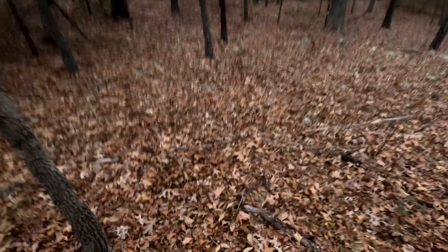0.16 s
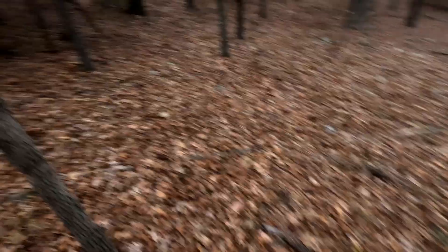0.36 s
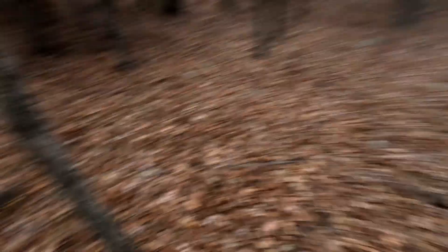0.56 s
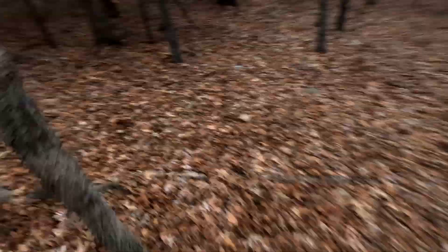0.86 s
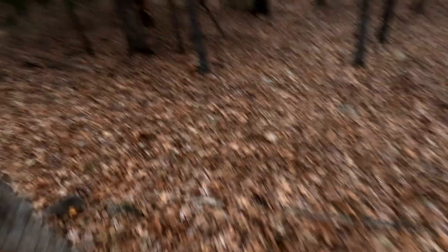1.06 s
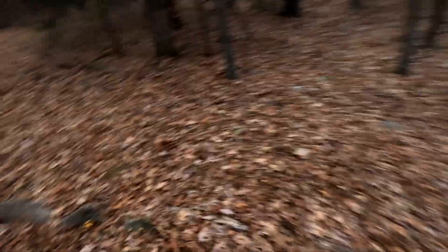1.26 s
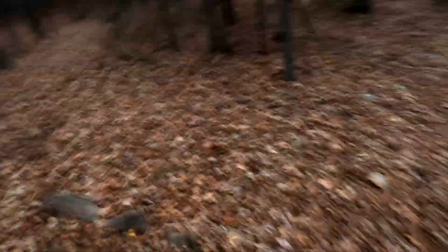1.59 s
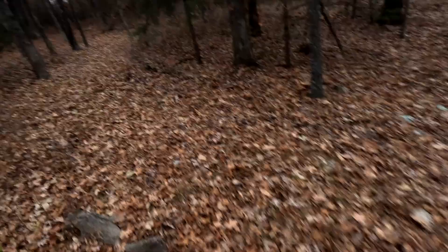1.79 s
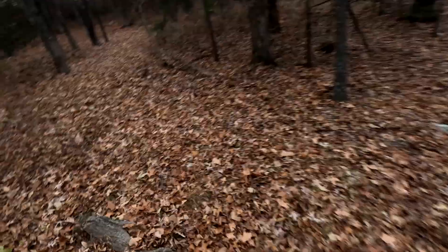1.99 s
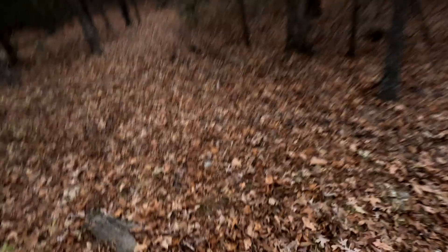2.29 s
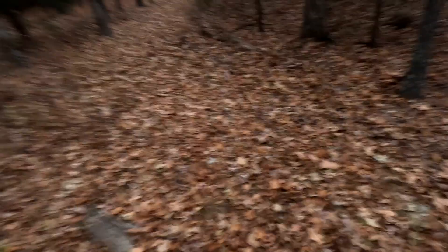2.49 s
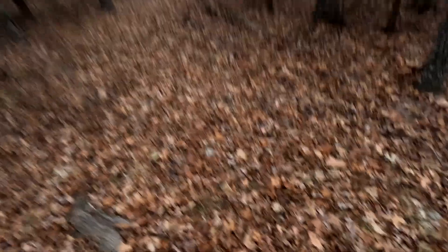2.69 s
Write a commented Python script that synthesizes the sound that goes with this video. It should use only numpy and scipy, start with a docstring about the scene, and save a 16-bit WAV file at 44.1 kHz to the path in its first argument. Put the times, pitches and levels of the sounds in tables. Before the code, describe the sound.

Brisk footsteps swish and crunch through dry fallen leaves in a still wood, with soft thuds on the soil. Twigs snap about halfway, then the steps continue. A close hand-held microphone rumbles low with the stride.

```python
"""Brisk steps through dry leaves

A still wood, heard from a hand-held microphone above the feet. Each foot sweeps the loose leaves
(a bright swish), then crushes the litter below (a darker crunch) and thuds on the soil. Twigs snap,
buried wood knocks and single leaves tick, while the swaying microphone rumbles with the stride."""
import sys
import numpy as np
from scipy import signal
from scipy.fft import rfft, irfft
from scipy.io import wavfile
from scipy.ndimage import uniform_filter1d

SR = 44100
rng = np.random.default_rng(int(sys.argv[2]) if len(sys.argv) > 2 else 0)


def unload_audio(sound):
    """Save the sound as a 16-bit wav file, at the path given as the first command line argument."""
    columns = np.transpose(np.atleast_2d(sound))
    # keep every value between -1 and 1, then stretch to whole-number steps
    steps = np.round(np.clip(columns, -1, 1) * 32767)
    wavfile.write(sys.argv[1], SR, steps.astype(np.int16))


N = 125685
TIME = np.arange(N) / SR
PADDED = 2 ** 17 + 2 ** 14   # FFT length, with room for filter tails
FREQS = np.maximum(np.arange(PADDED // 2 + 1) * SR / PADDED, 1)

# a foot sweeps loose leaves:
# (time [s], level [dB], rise [s], hold [s], fall [s], tilt [dB/octave], ring [Hz], ring gain [dB])
LEAF_SWEEPS = [(0.074, -54, 0.051, 0.075, 0.027, 1.5, 6750, 9.5),
               (0.144, -45, 0.047, 0.16, 0.096, 1, 4510, 9), (0.39, -65, 0.037, 0.062, 1, 2.5, 6700, -1),
               (0.831, -56.5, 0.0083, 0.062, 0.051, 0.5, 5280, 6),
               (0.95, -51, 0.077, 0.15, 0.17, -1, 3770, -2),
               (1.114, -49, 0.11, 0.0058, 0.09, 8.5, 5220, 11),
               (1.222, -60.5, 0.11, 0.16, .1, 0.5, 6600, 0), (1.365, -44, 0.039, 0.014, 0.039, 6, 6620, 5),
               (1.529, -44.5, 0.078, 0.04, 0.052, 0.5, 5450, 2),
               (1.624, -55, 0.1, .05, 0.19, 3, 3100, 13.5), (2.057, -59, 0.084, 0.11, .1, -4, 3060, 22.5),
               (2.314, -44, 0.17, 0.029, 0.19, 0.5, 5400, -1),
               (2.534, -63.5, 0.065, .03, 0.41, 0.5, 3090, 17)]
# spectrum of crushed litter: (frequency [Hz], relative level [dB])
LITTER_SPECTRUM = [(100, -23), (220, 3), (400, -14), (650, -0.5), (1000, 2), (1600, -5), (3000, -8.5),
                   (6000, -34), (10000, -70), (15000, -65)]


def from_db(db):
    """Decibels to gain."""
    return 10 ** (np.asarray(db) / 20)


def rms_one(x):
    """Scale to unit power."""
    return x / np.sqrt(np.mean(x ** 2) + 1e-20)


def at_hz(points):
    """Read a table over log frequency."""
    hz, value = np.transpose(points)
    return np.interp(np.log(FREQS), np.log(hz), value)


def bump(hz, width):
    """A bell of height 1 around a frequency."""
    return 1 / (1 + (2 * (FREQS - hz) / width) ** 2)


def mode(hz, t60):
    """Power response of one damped mode."""
    return bump(hz, np.log(1000) / (np.pi * t60))


def colour(x, curve_db):
    """Minimum-phase filter shaped like the curve; white noise keeps its power."""
    cepstrum = irfft(np.log(rms_one(from_db(curve_db))))
    cepstrum[1:PADDED // 2] *= 2
    cepstrum[PADDED // 2 + 1:] = 0
    return irfft(rfft(x, PADDED) * np.exp(rfft(cepstrum)))[..., :N]


def drift(hz):
    """Smooth random wander of unit power, mostly slower than the given rate."""
    hop, run_in = 40, 2000
    pole = np.exp(-2 * np.pi * hz * hop / SR)
    noise = rng.standard_normal(N // hop + run_in + 2)
    slow = signal.lfilter([1], [1, -2 * pole, pole * pole], noise)[run_in:]
    return np.interp(np.arange(N) / hop, np.arange(len(slow)), rms_one(slow))


def envelope(s, rise, hold, fall):
    """Swell to full level at time s, hold, fade; rise and fall are the times for 20 dB."""
    before = np.maximum(s - TIME, 0) / rise
    after = np.maximum(TIME - s - hold, 0) / fall
    return 10 ** -np.minimum(before + after, 10)


def burst(s, fall):
    """A sudden run of tiny fractures that dies away."""
    return rng.choice([-1, 1], N) * (TIME >= s) * envelope(s, fall, 0, fall)


def ring(s, hz, t60):
    """A struck mode: a sine that dies away."""
    age = np.maximum(TIME - s, 0)
    return np.sin(2 * np.pi * hz * age) * np.exp(-np.minimum(np.log(1000) * age / t60, 20))


def stereo_noise(width):
    """White noise, mostly shared by both sides."""
    mid, side = rng.standard_normal((2, N))
    return mid + width * side * [[1], [-1]]


def grains(force, per_s, spread_db):
    """Leaf fractures: random clicks, denser and stronger with the force, each from its own direction."""
    chance = np.clip(per_s / SR * force ** 0.6, 1e-4, 1)
    sizes = rms_one(from_db(spread_db * np.minimum(rng.exponential(1, N), 5)))
    signs = rng.choice([-1, 1], N)
    clicks = (rng.random(N) < chance) * sizes * signs * force / np.sqrt(chance)
    pan = 0.15 * rng.standard_normal(N)
    return clicks * (1 + pan * [[1], [-1]])


def wood_air():
    """The faint, steady air of the wood all around."""
    # (frequency [Hz], relative level [dB])
    air_spectrum = [(60, -1), (160, -6), (235, -0.5), (420, -12.5), (800, -7), (1100, -2.5), (1700, -1),
                    (3000, -6.5), (6500, -19.5), (10000, -31), (14000, -52)]
    return from_db(-64) * colour(stereo_noise(width=0.43), at_hz(air_spectrum))


def microphone_rumble():
    """The microphone wobbles in the hand with the stride, and air buffets it."""
    # swings of the microphone: (time [s], level [dB], rise [s], hold [s], fall [s], wobble [Hz])
    sways = [(0.223, -13.5, 0.14, 0.016, 0.049, 22.6), (0.306, -25.5, .03, 0.093, 0.054, 18.5),
             (1.002, -13.5, 0.024, 0.12, 0.13, 22.4), (1.414, -16.5, 0.16, 0.016, 0.038, 29),
             (1.453, -17, 0.043, 0.046, 0.051, 15), (1.571, -19.5, 0.01, 0.029, 0.042, 28.96),
             (1.657, -18.5, 0.025, 0.052, 0.098, 9), (2.116, -35, 0.046, 0.039, 0.15, 34),
             (2.323, -12.5, 0.047, 0.04, 0.078, 21), (2.56, -22, 0.19, 0.072, 0.39, 13.2)]
    # air on the microphone: (frequency [Hz], relative level [dB])
    buffet_spectrum = [(8, -5), (16, 9), (26, -3), (40, -9), (60, -19.5), (100, -35.5), (200, -56),
                       (500, -86.5), (4000, -130)]
    steady_db, buffet_db = -35, -4.5   # the buffet is relative to the sway
    wobble, motion = 0, 0
    for s, db, rise, hold, fall, hz in sways:
        sway = uniform_filter1d(from_db(db) * envelope(s, rise, hold, fall), size=900)
        wobble_hz = hz * np.exp(0.04 * drift(hz=5.67))
        wobble = wobble + sway * np.sqrt(2) * np.sin(2 * np.pi * np.cumsum(wobble_hz) / SR)
        motion = motion + sway
    air = np.hypot(from_db(steady_db), from_db(buffet_db) * motion) * stereo_noise(width=0.06)
    return wobble + colour(air, at_hz(buffet_spectrum))


def leaf_ticks():
    """Single brittle leaves crack, and bent ones spring back at random around each sweep."""
    # single leaves crack: (time [s], level [dB])
    leaf_cracks = [(0.354, -43.5), (0.393, -49), (0.397, -45), (0.466, -44.5), (0.546, -50.5),
                   (0.675, -52.5), (0.834, -49), (0.965, -35), (1.119, -34.5), (1.353, -41.5),
                   (1.3778, -33.5), (2.027, -55.5), (2.1138, -43), (2.199, -58), (2.461, -43),
                   (2.671, -51.5), (2.746, -57)]
    # one brittle leaf: (frequency [Hz], relative level [dB])
    tick_spectrum = [(500, -33), (1600, 4), (3000, 3.5), (6500, 4.5), (8000, -6.5), (10500, -14),
                     (14000, -53)]
    single = sum(from_db(db) * burst(s, fall=0.0043) for s, db in leaf_cracks)
    stirred = sum(from_db(db - 24) * envelope(s, rise, hold, fall=0.34)
                  for s, db, rise, hold, *_ in LEAF_SWEEPS)
    strays = stirred * grains(np.ones(N), per_s=99, spread_db=3)
    return colour(single + strays, at_hz(tick_spectrum))


def twig_snaps():
    """A sharp crack sets the twig ringing; splintering fibres keep it going."""
    # twigs break: (time [s], level [dB], splinter fall [s], crack gain [dB])
    snaps = [(1.2866, -34, .005, -8), (1.4434, -40, 0.0027, -6), (1.4474, -24, .008, -1)]
    # resonances of a twig: (frequency [Hz], gain [dB], t60 [s])
    twig_modes = [(680, -8, 0.0099), (1200, -1, 0.02), (1770, -6, 0.015), (3044, 1.5, 0.015),
                  (3700, -4, 0.005)]
    body_power = sum(from_db(db) ** 2 * mode(hz, t60) for hz, db, t60 in twig_modes)
    body_db = 10 * np.log10(body_power / (1 + (FREQS / 5000) ** 4))
    notes = sum((-1) ** k * from_db(db + mode_db) * ring(s, hz, t60)
                for s, db, _, _ in snaps for k, (hz, mode_db, t60) in enumerate(twig_modes))
    splinters = sum(from_db(db - 5) * burst(s, fall) for s, db, fall, _ in snaps)
    cracks = sum(from_db(db + crack_db) * burst(s, fall=0.002) for s, db, _, crack_db in snaps)
    band = signal.butter(2, [750, 5000], "band", fs=SR, output="sos")
    return signal.sosfilt(band, notes + colour(splinters, body_db) + cracks)


def wood_knocks():
    """Wood under the leaves answers with one damped note and a little grit."""
    # dull knocks on buried wood: (time [s], level [dB], pitch [Hz])
    knocks = [(0.3075, -32, 597), (0.3085, -36, 1380), (0.504, -57, 700), (0.667, -52, 1163),
              (1.9235, -43.5, 630), (2.3705, -35, 1365)]
    notes = sum(from_db(db) * ring(s, hz, t60=0.039) for s, db, hz in knocks)
    grit = sum(from_db(db - 10) * burst(s, fall=0.017) for s, db, _ in knocks)
    return notes + colour(grit, at_hz(LITTER_SPECTRUM))


def soil_thuds():
    """Soft blows on the soil: a low thump inside a dull crush."""
    # the sole lands: (time [s], crush level [dB], crush fall [s], thump level [dB], thump pitch [Hz])
    footfalls = [(0.307, -46, 0.047, -22, 84.6), (0.507, -80, 0.033, -41.5, 120),
                 (0.565, -70, 0.11, -56, 234), (1.01, -51, 0.074, -31, 118), (1.049, -52, 0.071, -58, 200),
                 (1.114, -35.5, 0.038, -34.5, 367), (1.283, -46.5, 0.029, -38, 149),
                 (1.442, -36, 0.013, -25, 138), (1.488, -42, 0.077, -21, 64.6),
                 (1.635, -49.5, .05, -27, 90), (1.71, -44, 0.059, -45, 101),
                 (1.755, -45, 0.055, -40.5, 168), (1.925, -59, 0.0083, -42.5, 194),
                 (2.314, -66, 0.035, -28.5, 95), (2.367, -49, 0.05, -35.5, 222),
                 (2.518, -53, 0.053, -44, 173)]
    # crushed soil: (frequency [Hz], relative level [dB])
    soil_spectrum = [(30, -28.5), (80, 8), (160, 4), (260, -5.5), (450, -18.5), (1500, -40.5), (5000, -75),
                     (15000, -100)]
    crush = sum(from_db(db) * burst(s, fall) for s, db, fall, _, _ in footfalls)
    thump = sum(from_db(db) * ring(s, hz, t60=0.036) for s, _, _, db, hz in footfalls)
    lowpass = signal.butter(2, 400, fs=SR, output="sos")
    return colour(crush, at_hz(soil_spectrum)) + signal.sosfilt(lowpass, thump)


def litter_crunches():
    """The packed litter gives way in clumps under the sole."""
    # weight bears down: (time [s], level [dB], rise [s], hold [s], fall [s])
    presses = [(0.54, -68, 0.039, 0.036, 0.21), (1.017, -52.5, 0.038, 0.12, 0.094),
               (1.112, -41, 0.01, 0.0038, 0.03), (1.396, -48, 0.081, 0.022, 0.058),
               (1.441, -30.5, 0.0018, 0.0056, 0.0049), (1.486, -32, 0.032, .035, 0.034),
               (1.633, -43.5, 0.059, 0.0098, 0.031), (1.699, -42, .05, 0.0155, .025),
               (1.752, -50.5, 0.0106, 0.014, .08), (1.867, -59, 0.11, 0.23, .2),
               (2.369, -47.5, 0.078, 0.0059, 0.068), (2.515, -52, .04, 0.032, 0.058),
               (2.567, -60, 0.009, 0.0071, 0.074), (2.622, -59, 0.052, .045, 0.059)]
    flutter_db = 1.75
    fractures = 0
    for s, db, rise, hold, fall in presses:
        force = envelope(s, rise, hold, fall) * from_db(flutter_db * drift(hz=60))
        fractures = fractures + from_db(db) * grains(force, per_s=4000, spread_db=4)
    return colour(fractures, at_hz(LITTER_SPECTRUM))


def leaf_swishes():
    """Loose leaves slide and crackle ahead of the foot; each patch rings at a pitch of its own."""
    # sliding leaves: (frequency [Hz], relative level [dB])
    swish_spectrum = [(150, -5.5), (450, -15.5), (800, -4.5), (1500, 3.5), (2500, 0.5), (4000, 0),
                      (6800, -2), (7800, -10), (10000, -18.5), (12000, -36), (15000, -48)]
    flutter_db = 2.56
    swishes = 0
    for s, db, rise, hold, fall, tilt, ring_hz, ring_db in LEAF_SWEEPS:
        force = envelope(s, rise, hold, fall) * from_db(flutter_db * drift(hz=45))
        tone_db = at_hz(swish_spectrum) + tilt * np.log2(FREQS) + ring_db * bump(ring_hz, width=280)
        swishes = swishes + from_db(db) * colour(grains(force, per_s=9000, spread_db=2), tone_db)
    return swishes


def near_reflections(x):
    """The ground and trunks close by throw back a brief spray, heard from the sides."""
    # reflected sound: (frequency [Hz], relative level [dB])
    spray_spectrum = [(100, -25), (280, 6.5), (700, 12), (1200, -7.5), (2200, -1.5), (3500, -8.5),
                      (6000, -17), (11000, 4)]
    decay = envelope(0, rise=1, hold=0, fall=0.015)
    spray = colour(rng.standard_normal(N) * decay, at_hz(spray_spectrum))
    side = signal.fftconvolve(x.mean(axis=0), rms_one(spray) / np.sqrt(N))[:N]
    return from_db(-14.5) * side * [[1], [-1]]


def scene():
    """Close footsteps and their reflections, over microphone rumble and the air of the wood."""
    feet = leaf_swishes() + litter_crunches() + soil_thuds() + wood_knocks() + twig_snaps() + leaf_ticks()
    return wood_air() + feet + near_reflections(feet) + microphone_rumble()


def record(dry):
    """The microphone: its housing colours the sound, its ports differ, and the top is cut."""
    # peaks and dips of the housing: (frequency [Hz], gain [dB], width [Hz])
    housing = [(804, -8, 138), (974, 4, 30), (1770, 5.5, 83), (2136, -10, 490), (3150, -2.5, 110),
               (3344, -10, 160), (4365, -6.5, 155), (5250, 5, 130), (6120, -1, 220), (6770, 6, 196),
               (8020, -6, 130)]
    # level between the ports: (frequency [Hz], left minus right [dB])
    port_balance = [(60, -2), (350, -2), (570, 3), (760, 1.5), (1400, 0), (1750, 3), (2500, 2.5), (3800, 4),
                    (4500, -2.5), (6700, -1.1), (8700, 0.7), (10500, 3.5)]
    # phase between the ports: (frequency [Hz], left lead [rad])
    port_phase = [(300, -0.023), (850, 0.59), (1300, -.3), (1800, -0.91), (2150, -1.7), (2900, -1.23),
                  (4100, -0.78), (4900, -0.34)]
    housed = colour(dry, sum(db * bump(hz, width) for hz, db, width in housing))
    sides = np.array([[1], [-1]]) / 2
    ports = from_db(sides * at_hz(port_balance)) * np.exp(1j * sides * at_hz(port_phase))
    padded = np.pad(housed, ((0, 0), (0, PADDED - N)), mode="linear_ramp")
    heard = irfft(rfft(padded) * ports)[:, :N]
    top_cut = signal.cheby2(12, 70, 16000, fs=SR, output="sos")
    return signal.sosfilt(top_cut, heard)


dry = scene()
out = record(dry)
unload_audio(out)
```